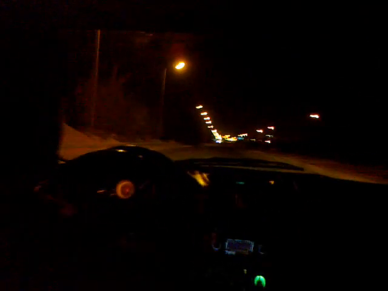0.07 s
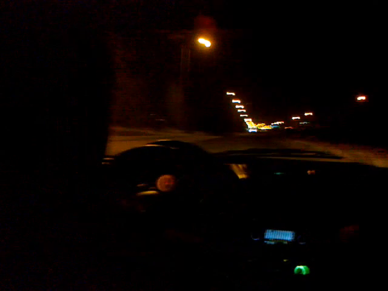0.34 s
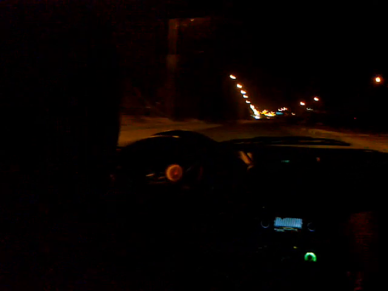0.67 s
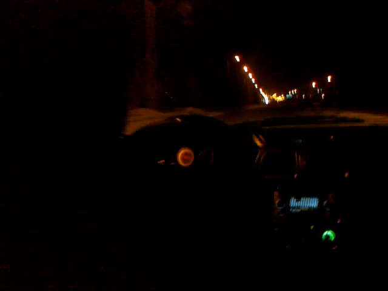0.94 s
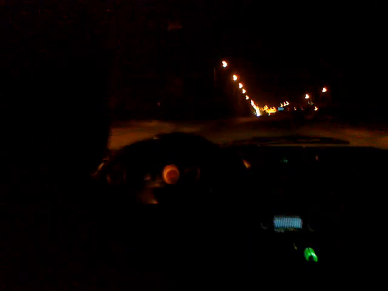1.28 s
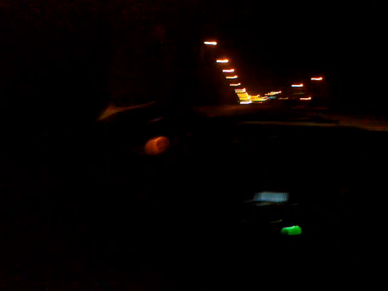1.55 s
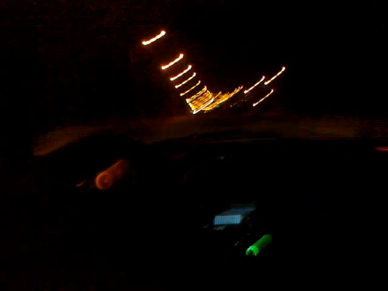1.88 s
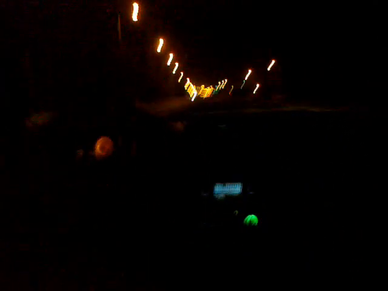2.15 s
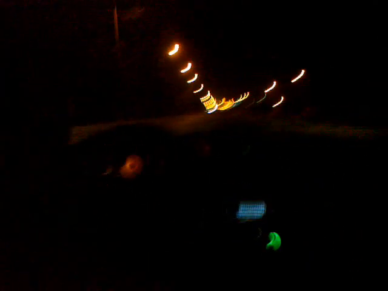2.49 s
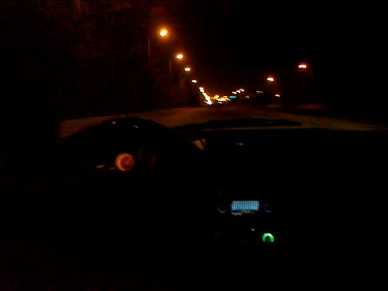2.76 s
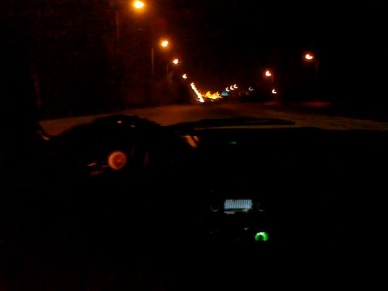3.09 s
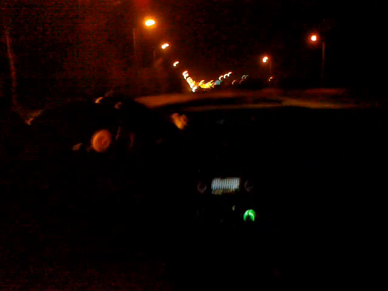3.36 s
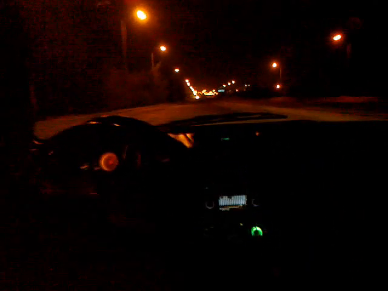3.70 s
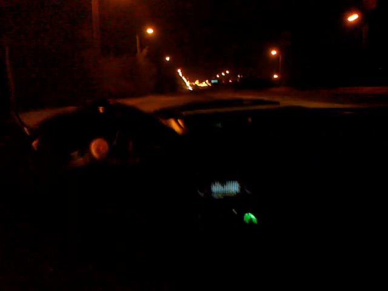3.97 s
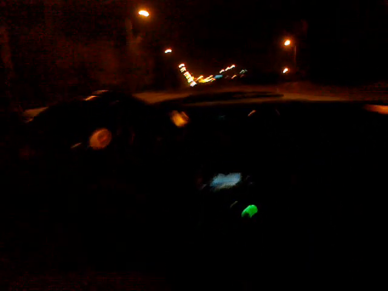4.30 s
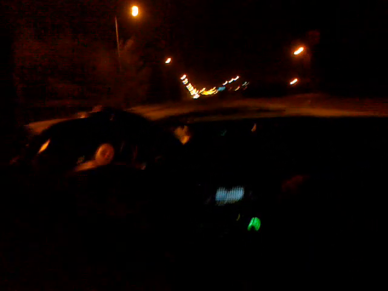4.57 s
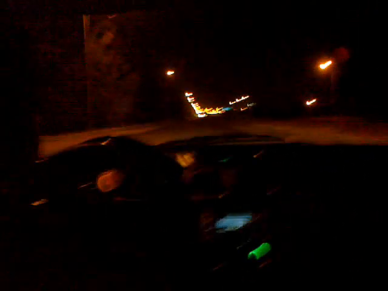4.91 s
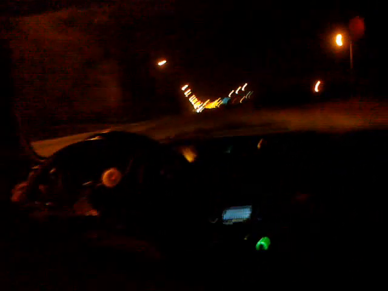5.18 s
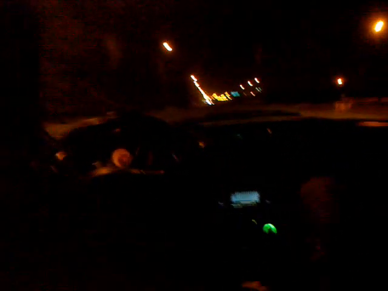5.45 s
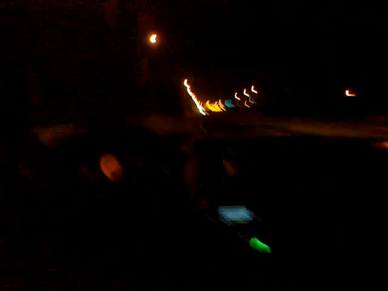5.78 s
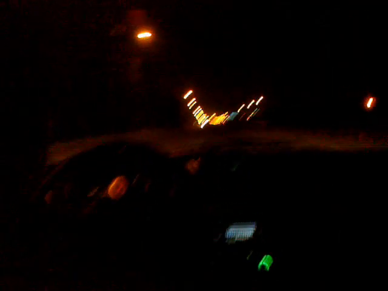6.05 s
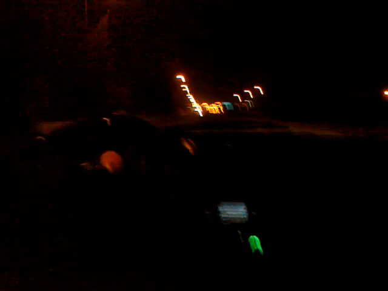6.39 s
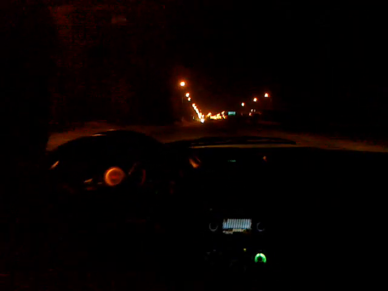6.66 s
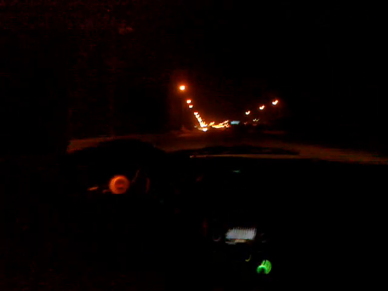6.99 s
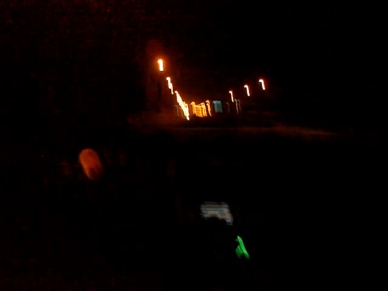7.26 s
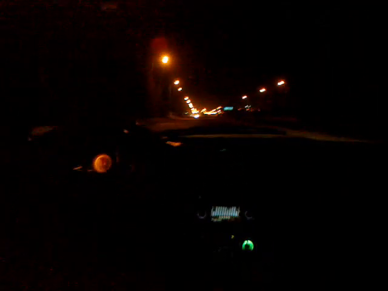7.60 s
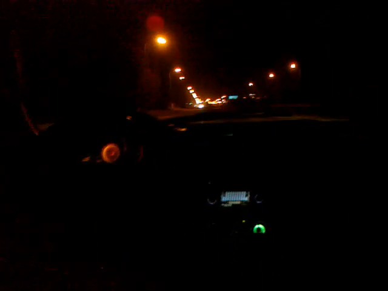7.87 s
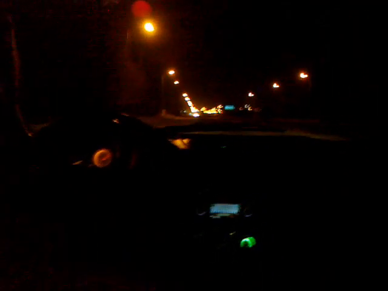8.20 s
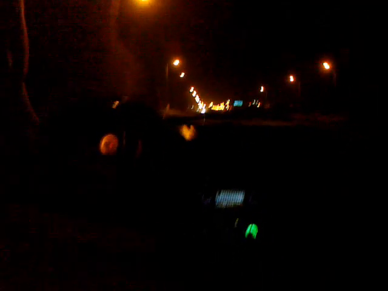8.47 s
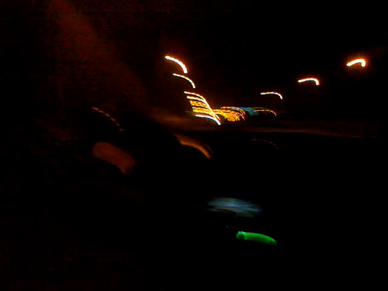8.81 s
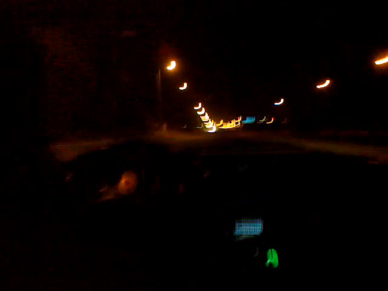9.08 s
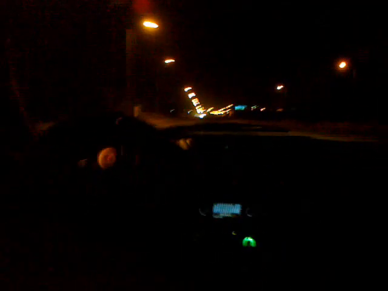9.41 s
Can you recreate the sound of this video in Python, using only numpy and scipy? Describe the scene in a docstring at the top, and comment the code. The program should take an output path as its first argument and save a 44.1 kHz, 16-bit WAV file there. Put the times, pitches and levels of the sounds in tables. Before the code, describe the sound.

A deep exhaust drone booms inside a car gathering speed on a road, with steady rumble, tyre noise and faint wind around it. The driver shifts up twice, once near the start and once past the middle. Each time the engine note falls and the turbo lets out a short, whistling hiss before pulling again. A few small clicks come from the interior trim, all heard from within the cabin.

```python
"""An exhaust drones over road rumble, heard inside a turbocharged four-cylinder car speeding up hard.
The drone is a stack of tones that follow the engine speed and boom in the cabin. Tyres and wind get
louder as the car gets faster. At each of two upshifts the driver lifts the throttle, and the turbo's
blow-off valve lets out its air with a hiss and a fluttering whistle. Trim ticks now and then.
The overall level is evened out and the peaks are held down."""
import sys
import numpy as np
from scipy import signal
from scipy.fft import irfft, next_fast_len
from scipy.io import wavfile
from scipy.ndimage import uniform_filter1d, minimum_filter1d, map_coordinates

SR = 44100
rng = np.random.default_rng(int(sys.argv[2]) if len(sys.argv) > 2 else 0)


def pcm_store(signal):
    """Save signal as 16-bit PCM."""
    levels = np.round(np.clip(np.atleast_2d(signal), -1, 1) * 32767)
    wavfile.write(sys.argv[1], SR, levels.astype(np.int16).T)


N = 416744

# the car's speed: t/s, speed (1 at the second shift)
ROAD_SPEED = [(0, .76), (.95, .82), (1.55, .82), (6.66, 1), (7.4, 1), (9.45, 1.04)]
# rough patches of road: t/s, half length/s, added rumble/dB, added tyre roar and wind/dB
ROUGH_PATCHES = [(1.147, 0.22, 4.5, 0.8), (4.15, 0.33, 0.5, 0.4), (5.87, 0.063, 4, 1),
                 (6.295, 0.084, 4.5, 2.5), (7.5, 0.3, .5, 1), (8.8, 0.15, 0, 1.5), (9.25, 0.33, -1, 1.1)]
# the tone colour of each noise: f/Hz, relative level/dB
BODY_SHAKE_COLOUR = [(6, -24), (13, -10), (21, 7.5), (29, 8.5), (45, 10), (55, -1), (75, -24.5), (200, -70)]
RUMBLE_COLOUR = [(35, -31), (55, -2.5), (68, 0.5), (86, 1), (105, -5), (130, -8), (170, -9.5), (250, -12.5),
                 (400, -28), (900, -76)]
TYRE_COLOUR = [(100, -13), (250, -2.5), (420, -1), (600, -3.5), (750, -6.5), (1100, -9), (1500, -8.5),
               (2100, -12), (2500, -17), (3000, -28), (4000, -39.5), (8000, -91.5)]
WIND_COLOUR = [(1500, -20.5), (2800, -2.5), (4000, 1), (5200, -1), (6500, -9), (8500, -15), (10500, -23.5),
               (13000, -34.5), (15500, -46)]
HIGH_HISS_COLOUR = [(5000, -13), (8500, 0.5), (12000, -2.5), (15500, -11)]
VALVE_JET_COLOUR = [(1000, -14), (2500, 8.5), (4500, 5.5), (6000, 2), (8500, -3.5), (10200, -6),
                    (11200, -10.5), (15500, -14)]
VALVE_SIZZLE_COLOUR = [(5000, -20), (8500, -4), (11000, 0), (12200, 1), (15500, -2)]
# cabin resonances that colour the tyre roar: f/Hz, width/Hz, boost/dB
CABIN_RESONANCES = [(829.4, 21, 6), (935, 45, 4.5), (1237, 59, 4.5), (1733, 113, 3.5), (2032, 70, 4)]
# low cabin resonances that the engine tones sweep through: f/Hz, boost/dB
CABIN_BOOM = [(100, 3.5), (119, 10.5), (139, 4.5), (146, 7.5), (166, 12), (180, 10.5), (199, 16.5),
              (218, 8.5), (255, 5.5), (288, 15), (306, 8), (328, 10.5), (345, 1), (375, 3), (410, -3.5),
              (480, -0.5)]
# trim, lever and valve contacts: t/s, peak level/dB, f/Hz, width/octaves, time to fade 60 dB/s
CONTACTS = [(.534, -46, 8940, 1.3, .006), (.968, -36, 3700, .6, .06), (.969, -27.5, 2370, .14, .087),
            (1.918, -49, 10930, 1, .004), (2.421, -29, 4800, 1.5, .009), (3.467, -16.5, 1300, 1.1, .012),
            (6.234, -44, 11000, 1.2, .003), (6.302, -11, 1400, 1.1, .014), (6.320, -20, 1400, .7, .025),
            (6.648, -33, 3000, 1, .16), (7.304, -40, 11000, 1.4, .0024), (7.334, -38.5, 11000, 1.4, .0026),
            (7.353, -37, 4200, 1.6, .028)]
# valve openings: t/s, length/s, hiss/dB, fade while open/(dB/s), fade on closing/(dB/s),
# whistle/dB, upper tone/dB
VALVE_OPENINGS = [(.99, .44, -45.5, 4.5, 480, -44.5, -62), (6.68, .46, -44.5, 13, 170, -45.5, -62)]
# engine speed (one cycle is two turns of the crank): t/s, revs/(cycles/s)
ENGINE_REVS = [(0, 48.9), (.85, 51.9), (.95, 52.9), (1.3, 48.4), (1.45, 45), (1.55, 38.7), (2.4, 39.95),
               (3.54, 41.9), (5.9, 46), (6.66, 47.2), (6.9, 44.6), (7.33, 37.8), (7.43, 35.1), (8.26, 35.7),
               (9.45, 36.8)]
# gear changes: throttle lifts/s, clutch bites/s, throttle back/s, shudder/(cycles/s),
# exhaust boost with the throttle shut/dB
UPSHIFTS = [(0.957, 1.551, 1.64, 1.34, 3.5), (6.593, 7.394, 7.44, 0.45, 1)]
# strong exhaust tones, each at "order" times the revs: order, level/dB, growth/(dB per dB of revs),
# change with the throttle shut/dB, change in the burble/dB
DRONE_TONES = [(3, -33.5, 0.8, -7.5, 10.5), (4, -31.5, -0.3, -10.5, 0), (5, -36, 1.2, -10, 1),
               (7, -44.5, 1.5, -6, 0), (8, -37, -1.5, -10.5, -3.5)]
# weaker exhaust tones: order, level/dB
RASP_TONES = [(2, -43), (9, -39.5), (11, -45), (12, -43), (13, -40.5), (14, -47), (16, -47.5), (17, -45),
              (20, -50), (21, -53.5)]

CRUISE_REVS = 40  # cycles/s; levels that follow the revs are counted from here


def amp(db):
    """Turn decibels into a gain."""
    return 10 ** (np.asarray(db) / 20)


def along(points, hz):
    """Read a table of (f/Hz, value) points at hz, on a log frequency axis."""
    freqs, values = np.transpose(points)
    return np.interp(np.log(hz + 1), np.log(freqs + 1), values)


def curve(points):
    """Join (t/s, value) points into one value per sample."""
    return np.interp(np.arange(N) / SR, *np.transpose(points))


def wobble(rate):
    """A smooth random curve through `rate` points a second."""
    knots = rng.standard_normal(int(N * rate / SR) + 4)
    grid = np.linspace(0, len(knots) - 1, 10 * len(knots))
    return np.interp(np.arange(N) * (rate / SR), grid, map_coordinates(knots, [grid]))


def swell(at_s, half_s):
    """A bell-shaped bump of height 1 around at_s."""
    return np.exp(-np.minimum(((np.arange(N) / SR - at_s) / half_s) ** 2, 50))


def noise(colour):
    """Noise of average level (rms) 1, shaped by colour(hz) in dB."""
    size = next_fast_len(N)
    hz = np.fft.rfftfreq(size, 1 / SR)
    bins = rng.standard_normal(len(hz)) + 1j * rng.standard_normal(len(hz))
    shaped = irfft(bins * amp(colour(hz)), size)[:N]
    return shaped / np.sqrt(np.mean(shaped ** 2) + 1e-20)


def running_level(x, span_s):
    """The level (rms) of x over a sliding window."""
    return np.sqrt(np.abs(uniform_filter1d(x ** 2, int(span_s * SR))) + 1e-9)


def steady_noise(points, span_s):
    """Noise coloured by a table, with swells slower than span_s evened out."""
    raw = noise(lambda hz: along(points, hz))
    return raw / running_level(raw, span_s)


def road_rumble(speed_db, patch_db):
    """The road shakes the body and rumbles in the cabin, more so at speed."""
    shake = amp(-18 + 0.98 * speed_db + 1.1 * wobble(1.8)) * steady_noise(BODY_SHAKE_COLOUR, 0.21)
    rumble = amp(-19.5 + speed_db + patch_db + 1.1 * wobble(4)) * steady_noise(RUMBLE_COLOUR, 0.22)
    return shake + rumble


def tyre_roar(speed_db, revs_db, patch_db, cycles):
    """Tyre roar and engine rush ring in the cabin; the four firings per cycle make them flutter."""
    def colour(hz):
        boost_db = sum(db * np.exp(-.5 * ((hz - centre) / width) ** 2)
                       for centre, width, db in CABIN_RESONANCES)
        return along(TYRE_COLOUR, hz) + boost_db

    level_db = -25 + 1.87 * speed_db + 0.35 * revs_db + patch_db
    surface_db = 0.32 * wobble(9) + 0.52 * wobble(60)
    flutter = 1 + 0.13 * np.sin(2 * np.pi * 4 * cycles) + 0.091 * np.sin(2 * np.pi * cycles)
    return amp(level_db + surface_db) * flutter * noise(colour)


def wind(speed_db, revs_db, patch_db, shut):
    """Air rushes past, joined by the intake at open throttle; a faint high hiss grows with speed."""
    engine_rush_db = 0.86 * revs_db
    rush_db = -49.5 + 2.57 * speed_db + engine_rush_db - 1.7 * shut + patch_db
    rush = amp(rush_db + 0.36 * wobble(10)) * noise(lambda hz: along(WIND_COLOUR, hz))
    high_hiss = amp(-66 + 6 * speed_db + engine_rush_db) * noise(lambda hz: along(HIGH_HISS_COLOUR, hz))
    return rush + high_hiss


def ticks():
    """Small parts touch: each gives a burst of noise in the band where it rings."""
    out, t = np.zeros(N + SR), np.arange(SR // 8) / SR
    for at_s, db, hz, octaves, fade_s in CONTACTS:
        edges = np.minimum(hz * 2 ** (np.array([-.5, .5]) * octaves), SR / 2 - 1)
        band = signal.butter(2, edges, "bandpass", fs=SR, output="sos")
        burst = rng.standard_normal(len(t)) * amp(-60 * t / fade_s)
        tick = signal.sosfilt(band, signal.sosfilt(band, burst))
        out[round(at_s * SR):][:len(t)] += amp(db) * tick / np.abs(tick).max()
    return out[:N]


def edge_tone(pitch_hz, width_hz):
    """Air swirling past an edge makes a breathy tone: a narrow band of noise around a moving pitch."""
    band = lambda: noise(lambda hz: -10 * np.log10(1 + (hz / width_hz) ** np.pi))
    phase = 2 * np.pi * np.cumsum(pitch_hz) / SR
    return band() * np.cos(phase) + band() * np.sin(phase)


def blow_off_valve(whistle_hz=6600, rise_hz=640, flutter_db=5, surge_at_s=.1, surge_width_s=.118,
                   open_db_per_s=167, whistle_fade_db_per_s=22, build_s=0.092):
    """Turbo air escapes as a hissing jet; its whistle rises, then sinks and gains an airy upper tone."""
    t, out = np.arange(N) / SR, np.zeros(N)
    jet = noise(lambda hz: along(VALVE_JET_COLOUR, hz))
    fizz = noise(lambda hz: along(VALVE_SIZZLE_COLOUR, hz))
    # the air surges soon after the valve opens
    surge = sum(np.exp(-np.abs((t - opens - surge_at_s) / surge_width_s) ** 3)
                for opens, *_ in VALVE_OPENINGS)
    pitch_hz = whistle_hz + rise_hz * surge
    fluttering = surge * amp(flutter_db * wobble(28)) * edge_tone(pitch_hz, width_hz=100)
    breathy_tail = (1 - surge) * amp(-1) * edge_tone(pitch_hz, width_hz=150)
    upper_tone = (1 - surge) * edge_tone(1.51 * pitch_hz, width_hz=330)
    for opens, length, hiss_db, sag, closing, whistle_db, upper_db in VALVE_OPENINGS:
        age = np.maximum(t - opens, 0)
        onset_db = -open_db_per_s * np.maximum(opens - t, 0)
        flow_db = onset_db - sag * age - closing * np.maximum(age - length, 0)
        hiss = amp(hiss_db + flow_db + 1.1 * wobble(76)) * jet
        # the fastest flow adds the highest treble
        sizzle = amp(hiss_db - 14 + 2.3 * flow_db + 2 * surge) * fizz
        fade_db = whistle_fade_db_per_s * (age - surge_at_s)
        tones = amp(whistle_db - fade_db) * (fluttering + breathy_tail) + amp(upper_db) * upper_tone
        build_up = np.minimum(age / build_s, 1)
        out += hiss + sizzle + build_up * amp(flow_db) * tones
    return out


def throttle_lifts(close_s=0.08, reopen_s=0.23):
    """One curve per shift: 0 at full throttle, 1 with the throttle shut."""
    t = np.arange(N) / SR
    return np.array([np.clip((t - lift) / close_s, 0, 1) * np.clip(.5 + (back - t) / reopen_s, 0, 1)
                     for lift, _, back, *_ in UPSHIFTS])


def clutch_shudder(rock_hz=7.77, decay_s=0.38):
    """The revs rock and settle after each bite of the clutch."""
    out = np.zeros(N)
    for _, bite, _, depth, _ in UPSHIFTS:
        age = np.maximum(np.arange(N) / SR - bite, 0)
        out -= depth * np.exp(-age / decay_s) * np.sin(2 * np.pi * rock_hz * age)
    return out


def burble(lifts, delay_s=0.254, rise_s=0.12):
    """From 0 to 1: the exhaust starts to burble once the throttle has been shut a while."""
    t = np.arange(N) / SR
    return sum(shut * np.clip((t - lift - delay_s) / rise_s, 0, 1)
               for (lift, *_), shut in zip(UPSHIFTS, lifts))


def exhaust_shift_db(lifts, slack_db=-17, lead_s=0.021):
    """Each shift has its own exhaust strength, which falls slack just before the clutch bites."""
    return sum(db * shut + slack_db * swell(bite - lead_s, half_s=0.03)
               for (_, bite, _, _, db), shut in zip(UPSHIFTS, lifts))


def exhaust(cycles, revs, lifts, smear=.23, whine_hz=1210, whine_width_hz=60):
    """Unevenly spaced exhaust pulses make tones at whole multiples of the revs; the cabin booms along."""
    tone = lambda order, lag: np.sqrt(2) * np.sin(2 * np.pi * (order * cycles - lag))
    boom_db = lambda order: along(CABIN_BOOM, order * revs)
    shut, burbling = lifts.sum(axis=0), burble(lifts)
    drone, rasp = np.zeros(N), np.zeros(N)
    for order, db, growth, shut_db, burble_db in DRONE_TONES:
        level_db = db + boom_db(order) + shut_db * shut + burble_db * burbling + 1.42 * wobble(12)
        # the pipe delays higher tones more, which smears the pulses into an even drone
        drone += amp(level_db) * (revs / CRUISE_REVS) ** growth * tone(order, smear * order ** 2)
    for order, db in RASP_TONES:
        level_db = db + boom_db(order) + 1.1 * wobble(2.6)
        uneven_burning = 1 + 0.32 * wobble(35)
        rasp += amp(level_db) * uneven_burning * tone(order, rng.random())
    rasp *= (revs / CRUISE_REVS) ** -0.48  # softer as the revs climb
    # near top revs, order 24 meets a cabin resonance and sings
    resonance = 1 / (1 + ((24 * revs - whine_hz) / whine_width_hz) ** 2)
    whine = amp(-37) * resonance * tone(24, 0)
    load = amp(-5.5 * shut)
    return amp(exhaust_shift_db(lifts)) * (drone + load * (rasp + whine))


def scene():
    """Everything as heard from inside the cabin, in one channel."""
    revs, lifts = curve(ENGINE_REVS) + clutch_shudder(), throttle_lifts()
    cycles = np.cumsum(revs * (1 + 0.0018 * wobble(15))) / SR  # engine cycles so far
    speed_db, revs_db = 20 * np.log10(curve(ROAD_SPEED)), 20 * np.log10(revs / CRUISE_REVS)
    patch_rumble_db, patch_roar_db = sum(np.outer(boosts_db, swell(at_s, half_s))
                                         for at_s, half_s, *boosts_db in ROUGH_PATCHES)
    engine = exhaust(cycles, revs, lifts)
    background = (road_rumble(speed_db, patch_rumble_db)
                  + tyre_roar(speed_db, revs_db, patch_roar_db, cycles)
                  + wind(speed_db, revs_db, patch_roar_db, shut=lifts.sum(axis=0)))
    return (engine + background + blow_off_valve() + ticks())[None]


def record(dry, target_db=-14.0, squeeze=.35, ceiling_db=-6.5, hold_s=0.01, top_hz=15720):
    """Ease the level toward a target, hold the peaks down, cut the highest treble and fade the ends."""
    even = dry[0] * (amp(target_db) / running_level(dry[0], span_s=.15)) ** squeeze
    needed_gain = np.minimum(1, amp(ceiling_db) / (np.abs(even) + 1e-9))
    span = int(hold_s * SR)
    held_gain = minimum_filter1d(needed_gain, span)
    smooth_gain = uniform_filter1d(uniform_filter1d(held_gain, span // 2), span // 2)
    treble_cut = signal.ellip(10, .05, 60, top_hz, fs=SR, output="sos")
    fades = np.minimum(1, np.minimum(np.arange(N), np.arange(N)[::-1]) / (.002 * SR))
    return (fades * signal.sosfiltfilt(treble_cut, even * smooth_gain))[None]


dry = scene()
out = record(dry)
pcm_store(out)
```